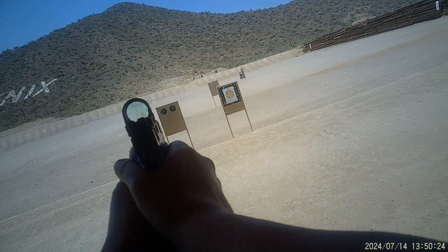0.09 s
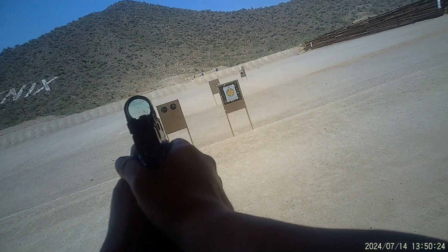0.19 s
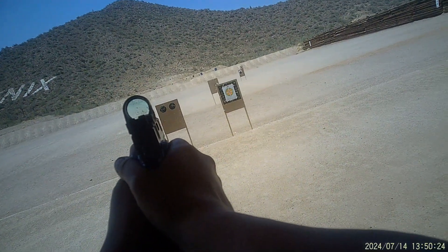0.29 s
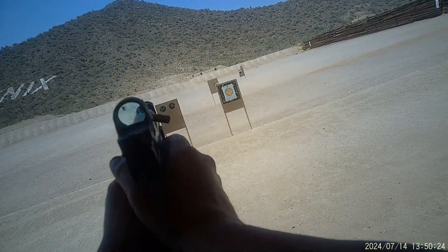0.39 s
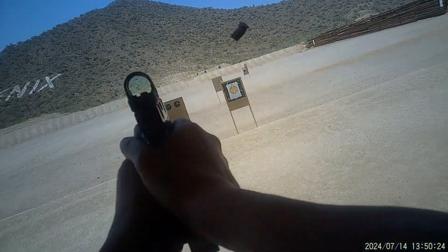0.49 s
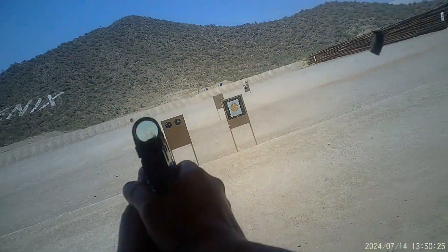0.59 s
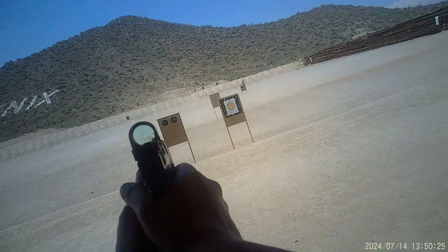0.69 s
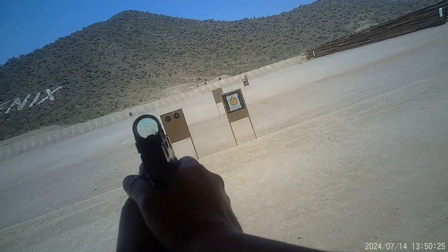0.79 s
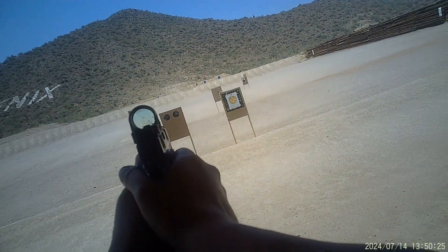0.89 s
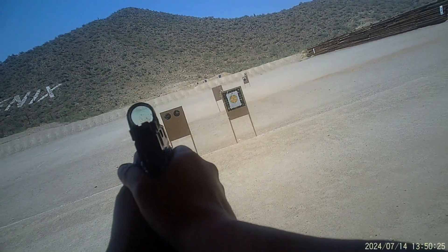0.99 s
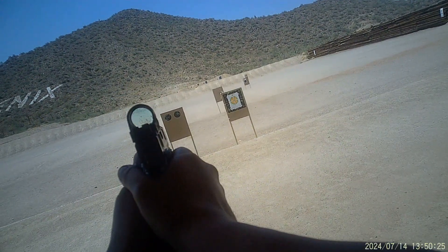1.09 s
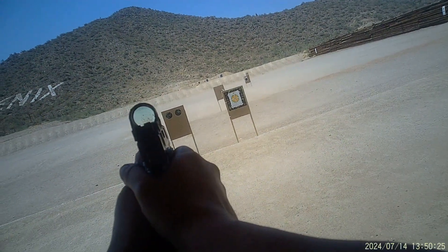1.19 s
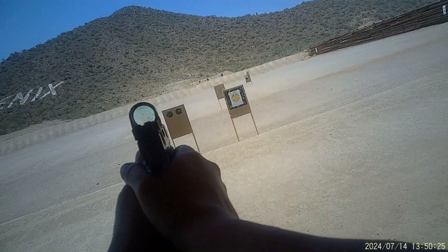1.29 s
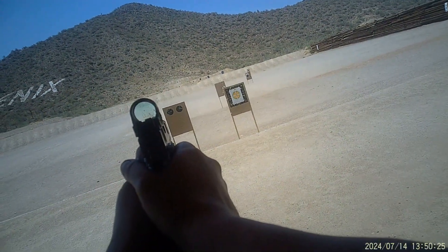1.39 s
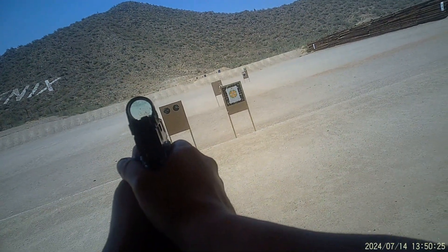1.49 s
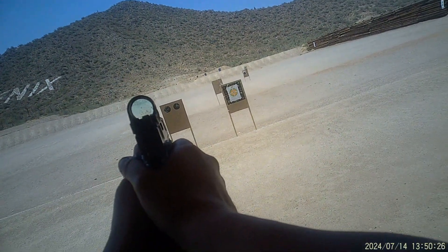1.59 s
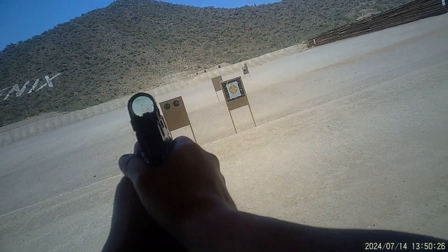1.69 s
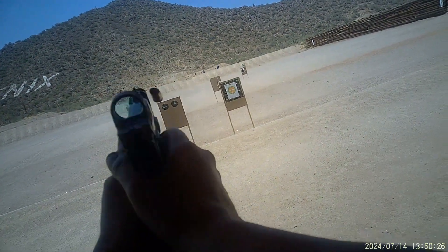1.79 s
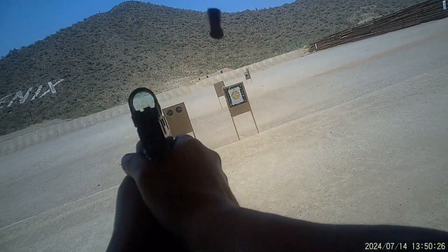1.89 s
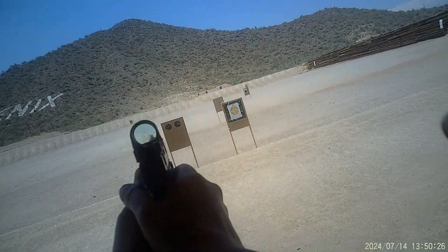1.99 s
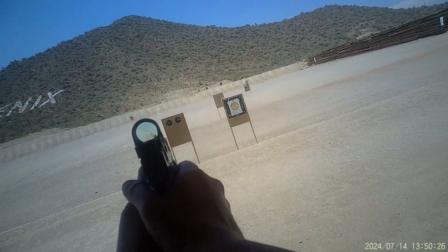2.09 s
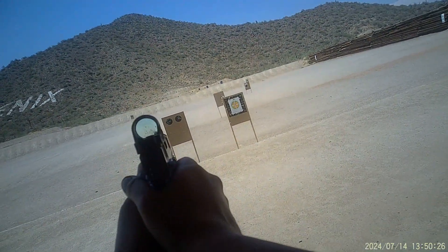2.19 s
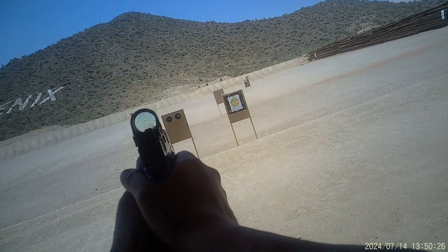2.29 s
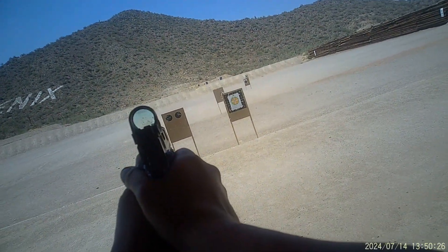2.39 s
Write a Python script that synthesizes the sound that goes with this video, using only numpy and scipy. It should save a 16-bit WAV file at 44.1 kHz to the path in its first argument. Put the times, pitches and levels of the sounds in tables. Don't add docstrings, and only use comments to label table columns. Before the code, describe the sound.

Pistol shots in two quick overloaded pairs at an open desert range, with short slap echoes

```python
import sys
import numpy as np
from scipy import signal
from scipy.fft import rfft, irfft, next_fast_len
from scipy.io import wavfile

SR = 44100
rng = np.random.default_rng(int(sys.argv[2]) if len(sys.argv) > 2 else 0)


def ratio(d):
    e = np.asarray(d, float) / 20
    return 10 ** e


def unload_audio(sound):
    columns = np.transpose(np.atleast_2d(sound))
    steps = np.round(np.clip(columns, -1, 1) * 32767)
    wavfile.write(sys.argv[1], SR, steps.astype(np.int16))


N = 105840

# t/s, gun (1 near, 0 neighbour), blast rms level/dB, roll t60/s
SHOTS = [
    (.2145, 0, 6, .12),
    (.4937, 1, 15, .27),
    (1.8733, 1, 14, .19),
    (2.0879, 0, 3, .095),
]


def at_hz(points, hz):
    table_hz, value = np.array(points).T
    return np.interp(np.log(hz), np.log(table_hz), value)


def drift(rate_hz):
    r = np.exp(-2 * np.pi * rate_hz * 20 / SR)
    slow = signal.lfilter([1], [1, -2 * r, r * r], rng.standard_normal(N // 20 + 2002))[2000:]
    return np.interp(np.arange(N) / 20, np.arange(len(slow)), slow / slow.std())


def dying(start, t60, rise=0.00024):
    t = np.maximum(np.arange(N) / SR - start, 0)
    return (1 - np.exp(-t / rise)) * ratio(-60 * t / t60)


def bands():
    white = rng.standard_normal((2, N))
    borders = 22 * 2 ** np.arange(0, 9.1, 1 / 3)
    bank = []
    for k, (low, high) in enumerate(zip(borders, borders[1:])):
        sos = signal.butter(2, [low, high], "band", fs=SR, output="sos")
        bank.append((np.sqrt(low * high), signal.sosfilt(sos, white[k % 2])))
    return bank


def puff(start, hz, t60, spread, noise):
    i = int(start * SR)
    n = min(len(noise), N - i)
    t = np.arange(n) / SR
    burst = ratio(-60 * t / t60) * np.minimum(t / 0.0015, 1)
    click = 1.1 * ratio(-240 * t / t60)
    sos = signal.butter(2, [hz / spread, hz * spread], "band", fs=SR, output="sos")
    y = signal.sosfilt(sos, noise[:n] * (burst + click))
    out = np.zeros(N)
    out[i:i + n] = y / np.abs(y).max()
    return out


def breeze():
    # f/Hz, level/dB per Hz
    air_colour = [(25, -6), (90, -4.5), (214, -6.5), (700, -4.5), (1150, -11.5), (2200, -24), (4000, -29.5),
                  (8500, -28.5)]
    # t/s, level/dB
    rustle = [
        (0.0, -51.5),
        (0.084, -56.5),
        (0.16, -57.5),
        (0.189, -59),
    ]
    air = sum(ratio(at_hz(air_colour, hz) + 1.7 * drift(30)) * noise for hz, noise in bands())
    s, db = np.transpose(rustle + [(.3, -57)])
    return ratio(np.interp(np.arange(N) / SR, s, db)) * air / air.std()


def metal():
    # t/s, peak level/dB, f/Hz, t60/s
    ticks = [(.005, -61, 3520, 0.42), (0.064, -46, 3300, 0.13), (0.076, -45.5, 1390, 0.13),
             (0.324, -12, 1470, 0.025), (0.097, -53, 3440, 0.59), (.098, -52, 2100, 0.17),
             (1.061, -44.5, 6100, 0.28), (0.371, -24.5, 3370, 0.011), (0.482, -25, 2500, 0.021),
             (.571, -11.5, 3900, .01), (.5835, 0, 890, 0.029), (0.353, -20, 3100, 0.016),
             (0.418, -22.5, 3160, 0.016), (1.0425, -23, 3640, 0.021), (1.042, -28.5, 2740, 0.019),
             (1.043, -31.5, 1230, 0.017), (1.052, -32, 4100, 0.04), (1.067, -43, 3800, 0.14),
             (2.028, -31, 3700, .015), (2.048, -33, 3750, 0.011), (2.2449, -25, 3400, 0.0089),
             (2.365, -44, 2830, .015)]
    # t/s, peak level/dB, f/Hz, t60/s
    clicks = [
        (1.2095, -44, 3000, .006),
        (1.2378, -33.5, 2400, 0.0089),
        (1.2528, -38, 2970, 0.011),
        (1.281, -40, 2500, .008),
        (1.4222, -40.5, 2900, 0.077),
        (.044, -51, 2600, 0.012),
    ]
    # f/Hz, level/dB, t/s, rise/s, t60/s
    rings = [(2374, -68, 1.24, .01, .4), (3020, -43, 1.28, .15, .9), (3871, -57, 1.245, .005, .8),
             (4317, -61, 1.21, .01, 2.5), (4893, -66, 1.21, .01, .9), (5265, -71, 1.21, .01, .9),
             (6223, -71, 1.22, .02, 1.2), (6923, -80, 1.23, .01, .9), (1663, -42, 1.046, .002, .1),
             (581, -40, 1.046, .002, .1), (210, -50, 1.22, .05, .7)]
    # f/Hz, level/dB, t60/s
    knock = [(1071, -.1, .11), (1464, -12, .1), (1669, -7, .11), (2450, -20, .05)]
    knock_s, knock_db = 1.4212, -31.5
    wobble_db, damped_t60_s = 2.5, 0.36

    t, out = np.arange(N) / SR, np.zeros(N)
    for events, spread in ((ticks, 1.12), (clicks, 1.55)):
        for s, db, hz, t60 in events:
            out += ratio(db) * puff(s, hz, t60, spread, rng.standard_normal(3000))
    damping = ratio(-60 * np.maximum(t - knock_s, 0) / damped_t60_s)
    for hz, db, s, rise, t60 in rings:
        strength = ratio(db + wobble_db * drift(21)) * dying(s, t60, rise) * damping
        out += strength * np.sin(2 * np.pi * hz * t)
    for hz, db, t60 in knock:
        strength = ratio(knock_db + db) * dying(knock_s, t60, rise=0.0014)
        out += strength * np.sin(2 * np.pi * hz * (t - knock_s))
    return out


def smear():
    t, rise_s = np.arange(N) / SR, .011
    gate = sum(np.clip((t - s + rise_s) / rise_s, 0, 1) ** .5 * (t < s) for s, *_ in SHOTS)
    return ratio(-35.5) * gate * rng.standard_normal(N)


def blasts():
    # f/Hz, level/dB per Hz
    roll_colours = [
        [(60, -18), (150, 2), (450, 2.5), (1200, -0.5), (2200, -14), (3000, -11), (3800, -15), (5200, -21.5),
         (8500, -28)],
        [(60, -30), (150, -9), (450, -5), (900, 3), (1500, -2.5), (2300, -27), (3800, -20), (5200, -32.5),
         (8500, -36)],
        [(60, -28.5), (150, -7.5), (550, 0), (850, 4.5), (1400, -2), (2300, -20), (3800, -18), (5200, -34),
         (8500, -29.5)],
        [(60, -24), (150, 0.5), (450, -2.5), (1000, 2), (2200, -13), (3800, -13.5), (5200, -22.5), (8500, -26)],
    ]
    # f/Hz, level/dB per Hz
    tail_colours = [
        [(40, -28), (110, -1), (300, -5.5), (1070, 1.2), (2300, -11), (3600, -14.5), (5200, -24.5),
         (8500, -35.5)],
        [(40, -32), (110, -9), (300, -5.5), (1070, -0.5), (2080, -22), (3790, -21.5), (5200, -33),
         (8500, -51.5)],
        [(40, -23), (150, -4), (400, -11.5), (950, -4.5), (2000, -14), (3500, -12.5), (5200, -26.5),
         (8500, -33)],
    ]
    tail_of_shot = [0, 1, 1, 2]
    # f/Hz, factor on roll t60
    roll_speed = [(60, 1), (300, 0.72), (1000, 0.63), (4000, 0.88), (8000, 0.78)]
    scatter_db = [-19, -22, -13.5, -21]
    scatter_t60_s = [0.82, 1, 0.49, 0.31]
    # f/Hz, peak level/dB, t60/s
    crack = [(1300, 8, .014), (3450, 16, .032)]
    crack_spread = [1.3, 1.12]
    hills_db, hills_t60_s = -15.5, 2.285
    hold_s = .007

    bank = bands()

    def rms(colour):
        return np.sqrt(sum(ratio(2 * at_hz(colour, hz)) * noise.var() for hz, noise in bank))

    roll_rms = [rms(colour) for colour in roll_colours]
    tail_rms = [rms(colour) for colour in tail_colours]
    late = np.zeros((len(tail_colours), N))
    for (s, *_), db, t60, k in zip(SHOTS, scatter_db, scatter_t60_s, tail_of_shot):
        hills = ratio(hills_db) * dying(s, hills_t60_s, rise=0.011)
        late[k] += ratio(db) * (dying(s, t60) + hills)

    out, lumps = np.zeros(N), drift(96)
    for hz, noise in bank:
        envelope = np.zeros(N)
        for (s, gun, db, t60), colour, total in zip(SHOTS, roll_colours, roll_rms):
            roll = dying(s, t60 * at_hz(roll_speed, hz), rise=hold_s * gun + 0.0001)
            envelope += ratio(db + at_hz(colour, hz)) / total * roll
        for colour, total, tail in zip(tail_colours, tail_rms, late):
            envelope += ratio(at_hz(colour, hz)) / total * tail
        out += noise * ratio(1.1 * lumps + 1.8 * drift(27)) * envelope
    out = signal.sosfilt(signal.butter(4, 132, "high", fs=SR, output="sos"), out)

    for s, gun, *_ in SHOTS:
        hz, db, t60 = crack[gun]
        out += ratio(db) * puff(s, hz, t60, crack_spread[gun], rng.standard_normal(2000))
    return out


def thumps():
    boom_db = [-24, -18.5, -22, -25.5]
    boom_hz, boom_t60_s = 96.3, 0.45
    sag_hz, sag_s = 49.7, .04
    push_db, push_s = -12, 0.0091
    t, out = np.arange(N) / SR, np.zeros(N)
    for (s, gun, *_), db in zip(SHOTS, boom_db):
        cycles = boom_hz * (t - s) - sag_hz * sag_s * np.exp(-np.abs(t - s) / sag_s)
        out += ratio(db) * dying(s, boom_t60_s, rise=0.03) * np.sin(2 * np.pi * cycles)
        out -= ratio(push_db + 4.6 * gun) * dying(s, 7 * push_s, rise=push_s)
    return out


def slaps():
    # t/s, peak level/dB, f/Hz, bright share/dB
    echoes = [(0.2592, 8.5, 1490, -16.5), (0.287, -4, 1385, -10), (0.301, -11.5, 1285, -16),
              (0.3305, -15.5, 1200, -15), (0.3595, -20.5, 900, -14.5), (0.38, -19.5, 1024, -12),
              (0.324, -12.5, 630, -6.5), (0.3535, -10, 1570, -11.5), (0.417, -6.5, 1188, -9),
              (0.451, -4.5, 1256, -16.5), (0.4635, -10.5, 750, -25.5), (0.555, -2, 780, -6.5),
              (0.584, -3.5, 850, -3.5), (0.577, -4, 802, -15), (0.596, -6.5, 804, -15),
              (0.618, -9, 1020, -10), (0.647, -31, 673, -9), (0.678, -11.5, 734, -25.5),
              (0.7345, -11, 976, -37), (0.7394, 1, 1325, -22), (0.7425, -5.5, 788, -32),
              (0.768, -11.5, 1085, -14), (0.805, -10.5, 797, -22.5), (1.0125, -23.5, 647, -32),
              (1.029, -31, 600, -28), (1.15, -31, 1110, -20), (1.209, -25, 1514, -10),
              (1.934, 11, 797, -10.5), (1.9635, 2.5, 900, -10.5), (1.997, -10, 884, -33),
              (2.028, -23.5, 900, -18.5), (2.058, -13.5, 940, -27.5), (2.103, -0.5, 705, -5.5),
              (2.108, -9.5, 833, -14), (2.118, -0.5, 1030, -4), (2.1325, 4, 766, -9),
              (2.1615, -3.5, 930, -11.5), (2.178, -13, 950, -17), (2.2035, -9.5, 1000, -7),
              (2.2325, -12, 980, -14), (2.291, -7.5, 1045, -8), (2.3365, -10, 720, -21),
              (2.366, -17.5, 700, -18)]
    length_s, pitch_fall = 0.0046, 0.2
    out, t = np.zeros(N), np.arange(N) / SR
    for s, db, hz, bright_db in echoes:
        spit_noise, trail_noise = rng.standard_normal((2, 2000))
        u = np.clip((t - s + 0.00073) / length_s, 0, 1)
        swell = np.sin(np.pi * u ** 1.5) ** 1.4
        cycles = hz * length_s * u * (1 + pitch_fall * (1 - u))
        body = swell * np.sin(2 * np.pi * cycles + spit_noise[0])
        spit = ratio(bright_db) * puff(s, 3300, .012, 1.22, spit_noise)
        trail = ratio(-12.5) * puff(s + 0.0024, 1.44 * hz, 0.004, 1.27, trail_noise)
        out += ratio(db - 7.5) * (body + spit + trail)
    return out


def scene():
    return (breeze() + metal() + blasts() + slaps())[None]


def overload(x):
    ceiling, hardness = .6, 4.0
    sag_share, sag_s = .3, .04
    x = x / (1 + np.abs(x / ceiling) ** (2 * hardness)) ** (.5 / hardness)
    hold = np.exp(-1 / (sag_s * SR))
    load = signal.lfilter([1 - hold], [1, -hold], np.abs(x))
    return x * (1 - sag_share * load)


def treble_gaps(x):
    dull_frames = [0, 4, 8, 13, 19, 26, 29]
    frame_s, frame_zero_s = .064, .2435
    gap_s, fade_s = 0.061, 0.0051
    split_hz, edge_hz = 4640, 220
    size = next_fast_len(N + 4096)
    hz = np.arange(size // 2 + 1) * SR / size
    low = irfft(rfft(x, size) * np.clip((split_hz - hz) / edge_hz, 0, 1), size)[:, :N]
    t, keep = np.arange(N) / SR, np.ones(N)
    for k in dull_frames:
        end = frame_zero_s + k * frame_s
        outside = np.maximum(end - gap_s - t, t - end)
        keep *= np.clip(outside / fade_s + .5, 0, 1) ** 2
    treble = rfft((x - low) * keep, size) * np.clip((hz - split_hz) / edge_hz + 2, 0, 1)
    return low + irfft(treble, size)[:, :N]


def band_limit(x):
    return signal.sosfilt(signal.butter(12, 9250, fs=SR, output="sos"), x)


def record(dry):
    x = overload(dry) + thumps() + smear()
    x = signal.sosfilt(signal.butter(1, 18, "high", fs=SR, output="sos"), x)
    x = signal.sosfilt(signal.cheby2(9, 60, 9760, fs=SR, output="sos"), x)
    return band_limit(treble_gaps(x))


dry = scene()
out = record(dry)
unload_audio(out)
```